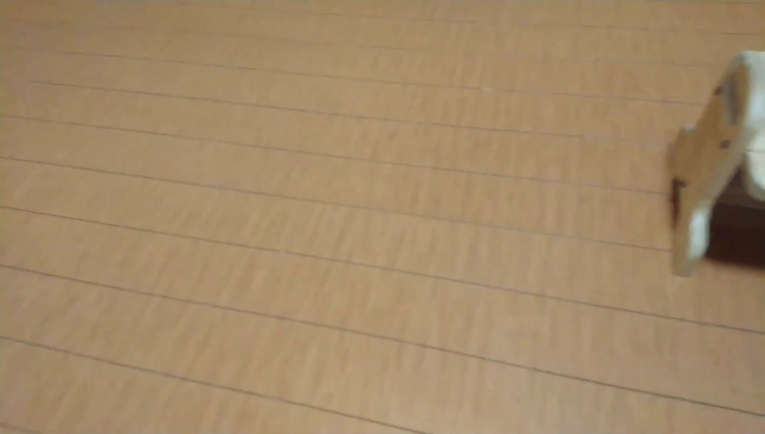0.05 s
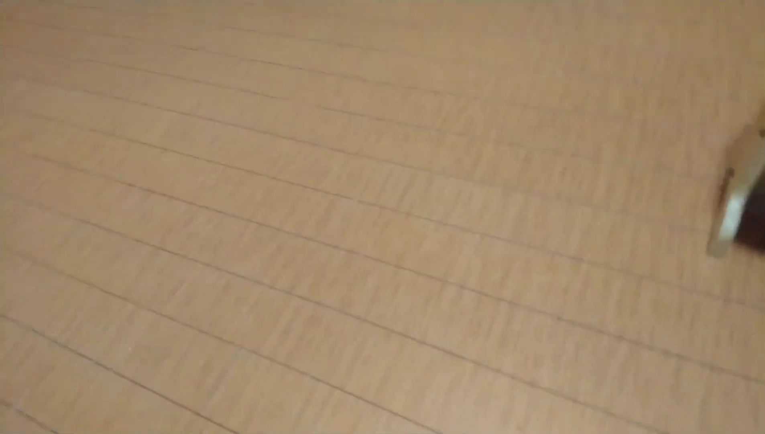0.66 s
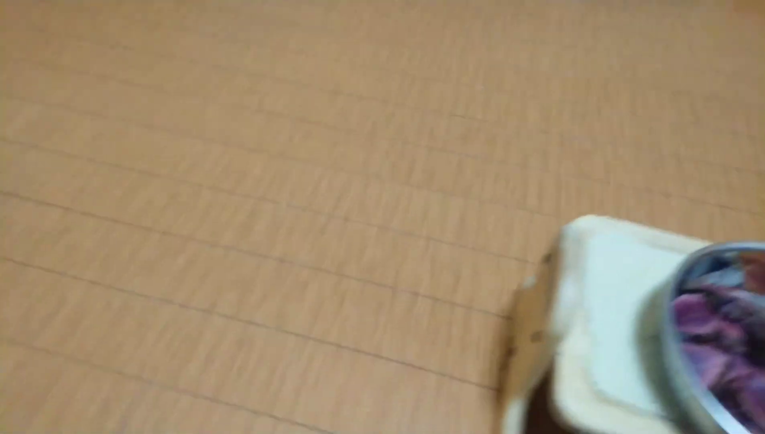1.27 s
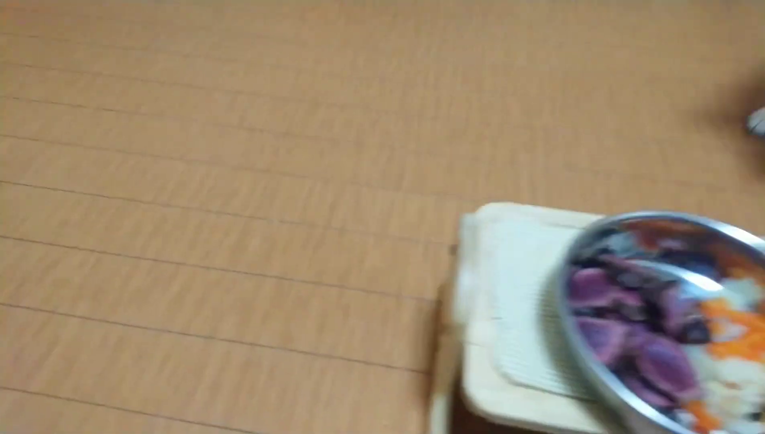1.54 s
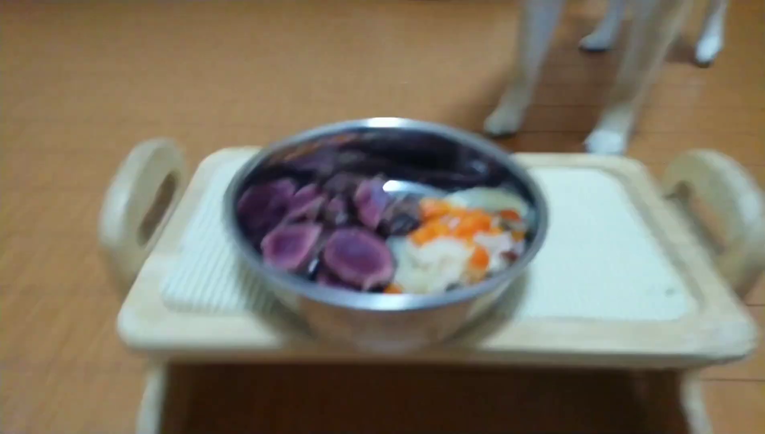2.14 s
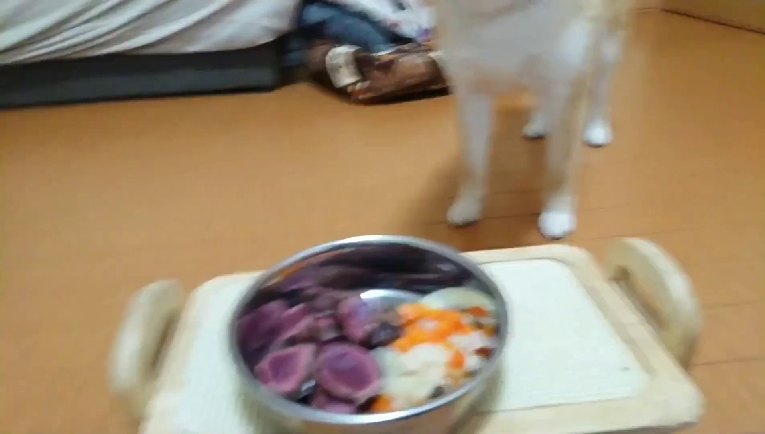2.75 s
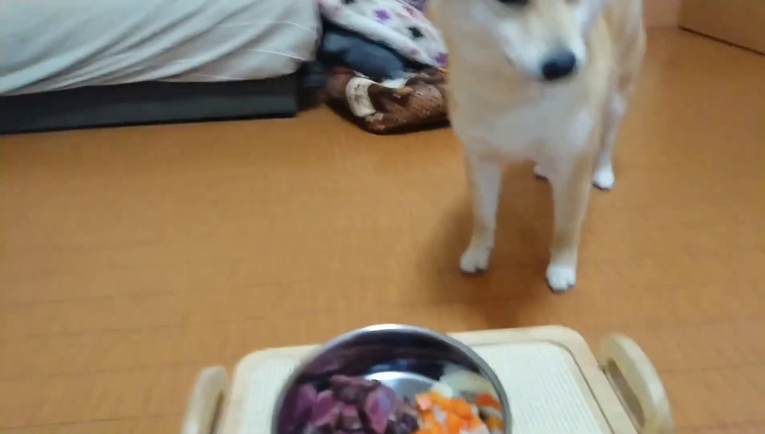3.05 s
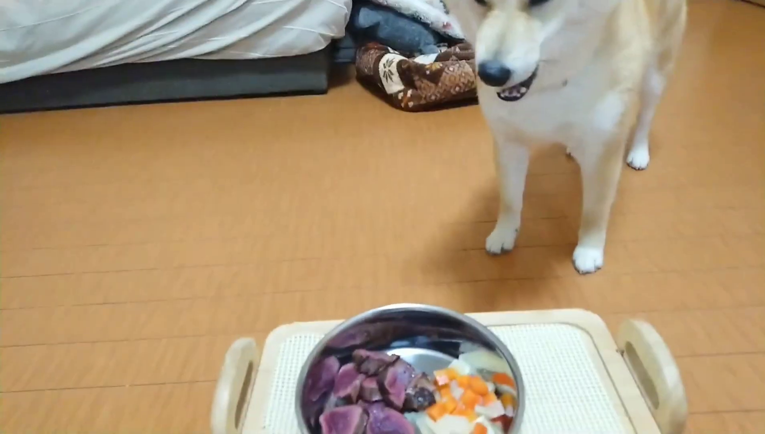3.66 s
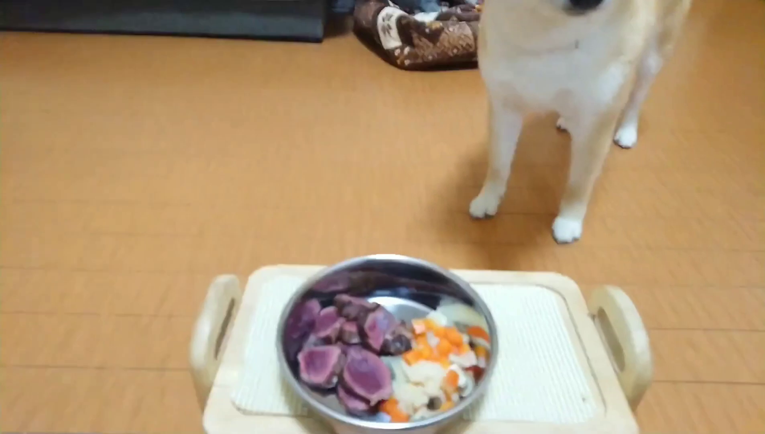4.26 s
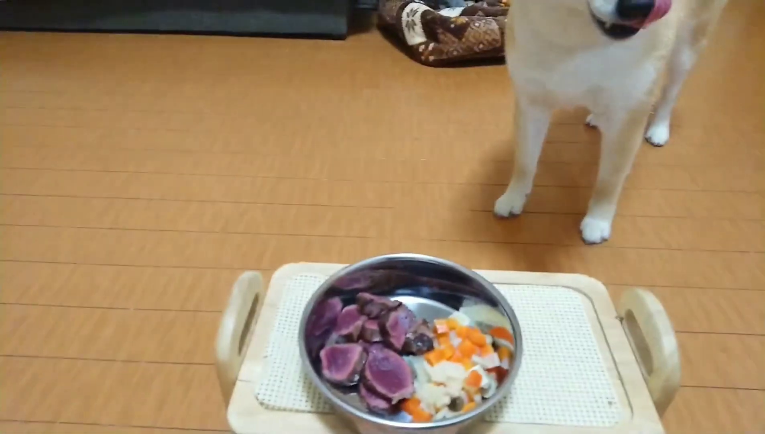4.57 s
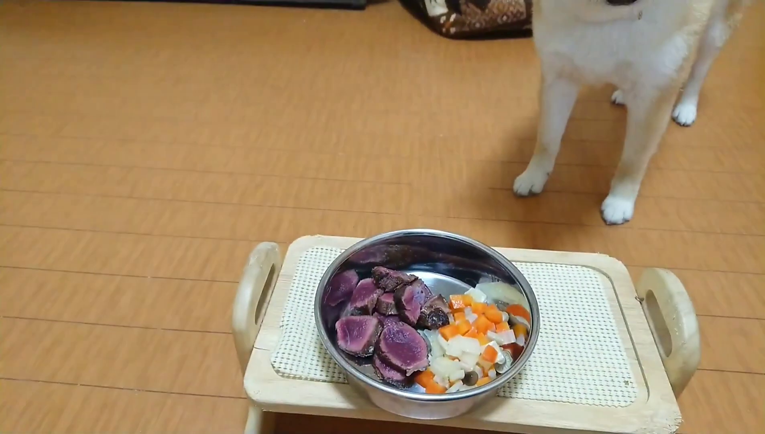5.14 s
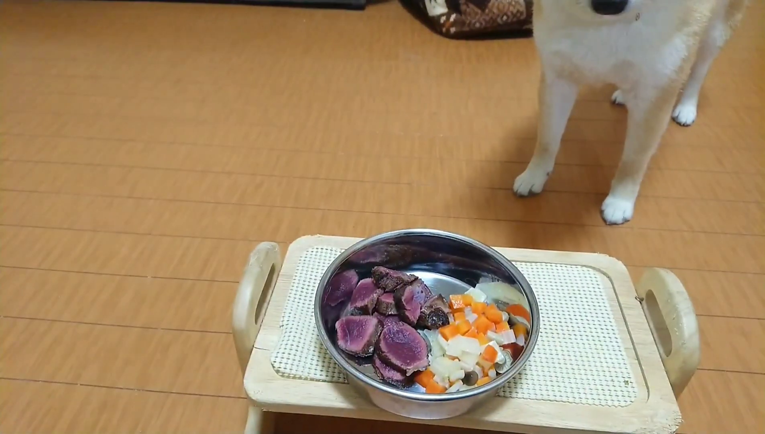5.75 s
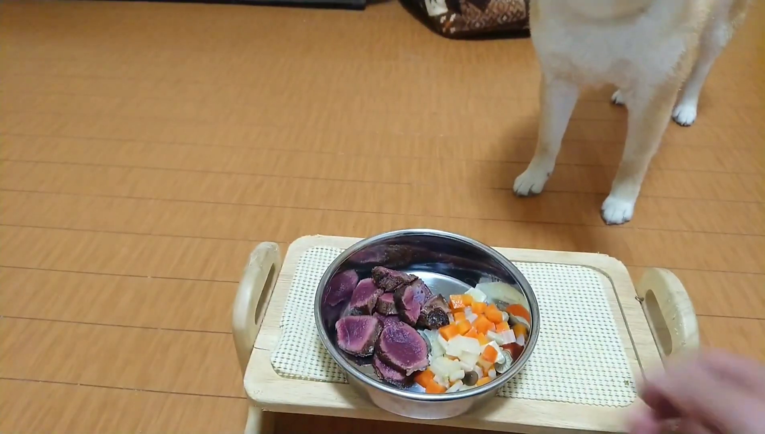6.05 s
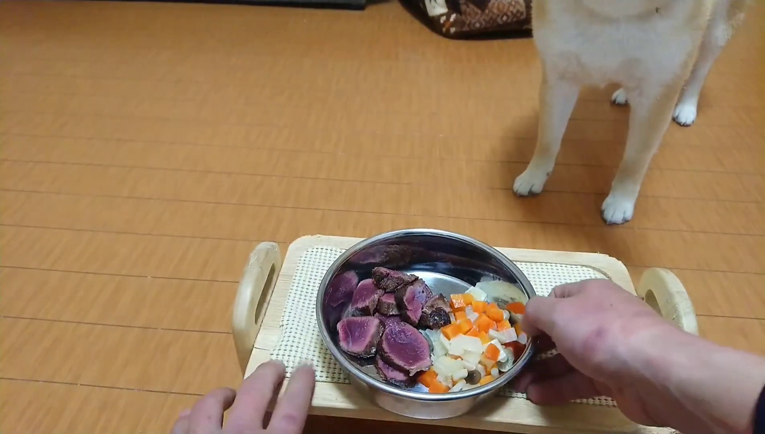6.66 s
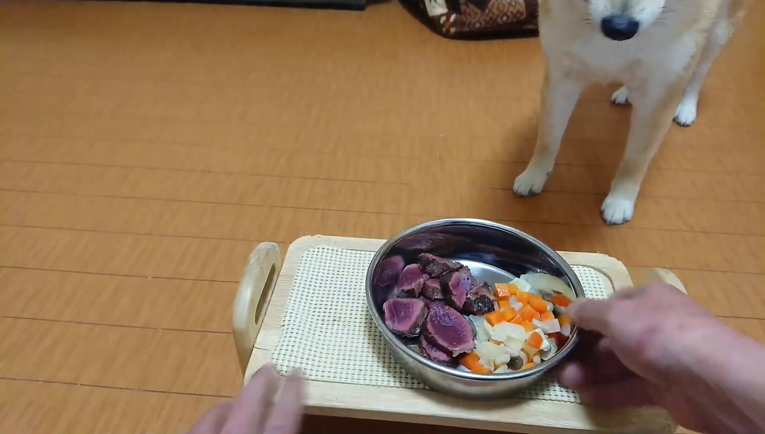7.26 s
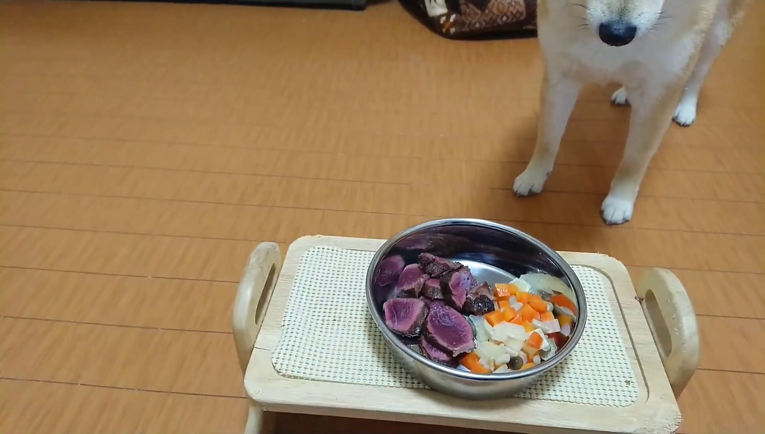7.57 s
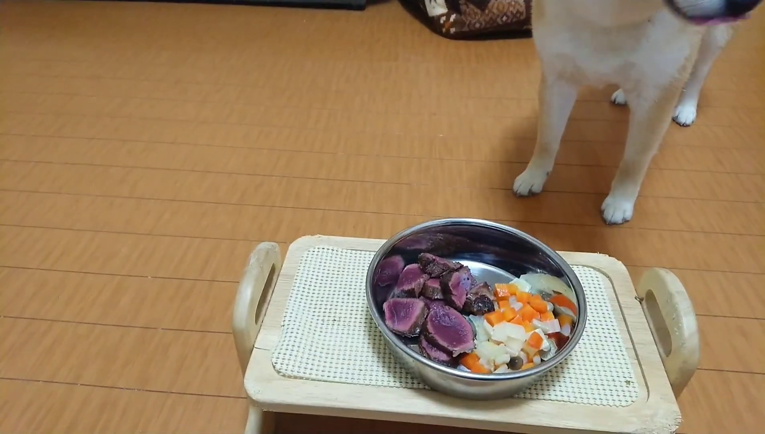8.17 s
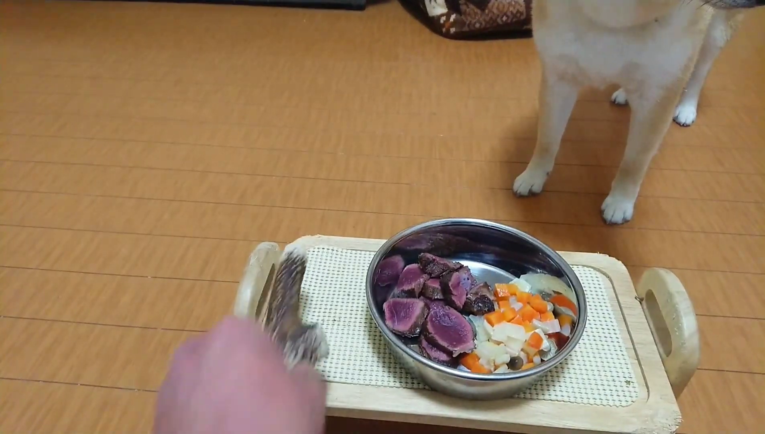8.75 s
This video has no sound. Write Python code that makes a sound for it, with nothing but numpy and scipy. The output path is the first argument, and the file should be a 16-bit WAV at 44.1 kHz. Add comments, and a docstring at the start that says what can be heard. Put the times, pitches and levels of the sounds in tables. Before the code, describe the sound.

At about 0.3 seconds a small wooden feeding stand lands on a wooden floor in a loud, quick clatter, and the steel bowl on it rings faintly. From 1 second the stand is pushed, its feet scraping and catching, then giving a harsh groan and hoot between 1.6 and 1.9 seconds. From about 2.3 to 5 seconds fingers shift on the microphone with close hollow bumps, pops, ticks and rubbing, sharpest around 3 seconds, with a low creak near 4.8. Clothes swish from 5.5 seconds and a sole scuffs near 6. At 7.2 seconds the full bowl is set on the stand with two knocks and a short, damped ring, and the stand rocks with a few low thuds. Soft shuffling steps follow from 8 seconds to nearly 9. Everything is heard at arm's length in a small living room with a faint low rush.

```python
"""A wooden feeding stand with a steel bowl on it clatters down on a wooden floor; the bowl's rim rings.
At 1 s the stand is pushed: its feet scrape, then stick and slip so fast that they groan and hoot.
From 2 to 5 s fingers shift on the phone that hears it all: hollow bumps, pops, ticks and rubbing.
Clothes rustle and a sole scuffs. At 7 s the full bowl is set back, the stand rocks, and soft steps follow.
The place is a small living room, heard at arm's length."""
import sys
import numpy as np
from scipy import signal
from scipy.fft import rfft, irfft, next_fast_len
from scipy.io import wavfile
from scipy.ndimage import uniform_filter1d

SR = 44100
rng = np.random.default_rng(int(sys.argv[2]) if len(sys.argv) > 2 else 0)


def wrap_up_sound(samples):
    """Save the sound to the file named by the first command line argument, as 16-bit audio."""
    columns = np.atleast_2d(samples).T
    # keep every value between -1 and 1, then stretch to whole-number steps
    tamed = np.clip(columns, -1, 1)
    steps = np.round(tamed * 32767).astype(np.int16)
    wavfile.write(sys.argv[1], SR, steps)


N = 397244
T = np.arange(N) / SR

# Each row: start in seconds, level in dB, brightness in Hz, push on the floor in dB.
STAND_KNOCKS = [(0.274, -44, 200, -20.5), (0.2861, -14, 12100, -28), (0.2935, -19.5, 6000, -35),
                (.302, -19.5, 2600, -14.5), (0.312, -23.5, 2200, -24.5), (0.3495, -17.5, 9000, -27),
                (.377, -27.5, 1800, -21.5)]  # the legs land
FOOT_CATCHES = [(1.008, -39.5, 400, -41), (1.178, -36, 900, -38.5), (1.262, -36, 1700, -41.5)]  # a sliding foot catches on the boards
BOWL_KNOCKS = [(7.206, -19.5, 12000, -23), (7.2942, -24.5, 8000, -27)]  # the bowl lands on the stand's mat
# Modes are the notes a thing rings with. Each row: pitch in Hz, level in dB, seconds to fade by 60 dB.
STAND_MODES = [(479, -6.5, 0.18), (903, -0.5, .19), (1117, -3.5, 0.19), (1180, -0.5, 0.18), (1485, -1, 0.1),
               (1670, -3, 0.17), (2192, -1, 0.11), (2460, 2.5, 0.06), (3406, 2, 0.065), (4950, 0, 0.051)]  # wooden panels
BOWL_MODES = [(1045, 4, 0.26), (1230, 5, 0.28), (1977, -1, 0.09), (2720, -5, 0.066), (3340, -8.5, 0.13)]  # steel wall, damped by food and fingers
# The tone of the stand's clack. Each row: frequency in Hz, level in dB.
STAND_COLOUR = [(200, -6.5), (330, -12), (476, -7.5), (570, -11.5), (1020, -5.5), (1400, -12), (2400, -13),
                (4900, -15), (6200, -19), (10500, -29), (15000, -56.5)]


def undb(db):
    """Turn decibels into a gain."""
    return 10 ** (np.asarray(db) / 20)


def unit(x):
    """Scale to an average (rms) level of 1."""
    return x / np.sqrt(np.mean(x ** 2))


def pan(db):
    """Two gains that make the left side db louder than the right."""
    return undb(np.array([[db], [-db]]) / 2)


def delay_left(x, seconds):
    """The sound reaches the left microphone later than the right."""
    return np.array([np.roll(x[0], round(seconds * SR)), x[1]])


def add(out, s, x):
    """Mix x into out at s seconds."""
    i = int(s * SR)
    out[..., i:i + x.shape[-1]] += x[..., :N - i]


def cut(x, hz, kind="low", order=2):
    """Keep what lies below hz ("low") or above it ("high")."""
    return signal.sosfilt(signal.butter(order, min(hz, SR / 2 - 1000), kind, fs=SR, output="sos"), x)


def convolve(x, response):
    """Play x through something that answers a click with this response."""
    return signal.fftconvolve(np.atleast_2d(x), np.atleast_2d(response), axes=1)[:, :x.shape[-1]]


def colour(x, points, size=4096):
    """Shape the tone of x along a curve of (Hz, dB) points."""
    hz, db = np.transpose(points)
    freqs = np.maximum(np.fft.rfftfreq(size, 1 / SR), 1)
    gain = undb(np.interp(np.log(freqs), np.log(hz), db)) * np.minimum(freqs / hz[0], 1) ** 2
    # fold the filter in time so that it never sounds before its input
    cepstrum = irfft(np.log(gain))
    cepstrum[1:size // 2] *= 2
    cepstrum[size // 2 + 1:] = 0
    response = irfft(np.exp(rfft(cepstrum)))
    return convolve(x, response / np.linalg.norm(response))


def noise(count=N, alike_hz=600):
    """White noise at two microphones: alike in the bass, unrelated in the treble."""
    size = next_fast_len(count, real=True)
    mid, side = rfft(rng.standard_normal((2, size)))
    alike = .85 / (1 + (np.fft.rfftfreq(size, 1 / SR) / alike_hz) ** 2)
    spectrum = mid * np.sqrt(1 + alike) + side * np.sqrt(1 - alike) * np.array([[1], [-1]])
    return unit(irfft(spectrum, size)[:, :count])


def band(hz, width_hz):
    """A band of noise around one pitch."""
    return unit(cut(noise(), width_hz / 2) * np.cos(2 * np.pi * hz * T))


def walk(rate):
    """A random wobble of size about 1 that turns rate times a second."""
    step = max(int(SR / rate), 1)
    return unit(uniform_filter1d(np.repeat(rng.standard_normal(N // step + 1), step), step)[:N])


def fade(t60, count=SR):
    """A fade of 60 dB in t60 seconds."""
    return np.exp(-np.log(1000) * T[:count] / t60)


def swell(s, rise, fall, hold=0):
    """Rise to full strength at time s, hold, then fall; all in seconds."""
    before, after = np.maximum((s - T) / rise, 0), np.maximum((T - s - hold) / fall, 0)
    return np.exp(-np.minimum(before ** 2 + after * np.sqrt(after), 30))


def ring(modes):
    """A struck object: one fading sine for each mode."""
    return sum(undb(db) * fade(t60) * np.sin(2 * np.pi * hz * T[:SR]) for hz, db, t60 in modes)


def blow(x, db):
    """Give a short sound the energy of 10 ms at this level."""
    return x * undb(db) * np.sqrt(SR / 100 / np.mean(np.sum(x ** 2, axis=-1)))


def plop(hz, t60, count=4096):
    """One note that dies quickly."""
    return blow(np.sin(2 * np.pi * hz * T[:count]) * fade(t60, count), 0)


def chatter(t60, count=4096):
    """The tiny impacts of one contact: a noise burst, even from bass to treble."""
    spectrum = rfft(noise(count) * fade(t60, count))
    return irfft(spectrum / np.abs(spectrum)) * fade(4 * t60, count)


def knocks(rows, body, modes, chatter_t60, ring_db):
    """Each contact gives a short clack and a few notes that ring longer."""
    out, ringing = np.zeros((2, N)), blow(ring(modes), ring_db)
    for s, db, hz, _ in rows:
        contact = cut(chatter(chatter_t60), hz, order=1)
        add(out, s, blow(colour(contact, body), db))
        add(out, s, undb(db) * cut(ringing, hz, order=1))
    return out


def room(x, wet_db, bass_t60=0.33, treble_t60=0.19):
    """Add a small room's echo at wet_db; its treble dies first."""
    diffuse = noise(SR)
    bass = cut(diffuse, 2500, order=1)
    tail = (bass * fade(bass_t60) + (diffuse - bass) * fade(treble_t60)) * np.minimum(T[:SR] / 0.0092, 1)
    return x + undb(wet_db) * convolve(x, tail / np.linalg.norm(tail[0]))


def air(db=-55.5):
    """The room's faint, low rush wavers a little."""
    # Each row: frequency in Hz, level in dB.
    tone = [(30, -22), (65, -2), (163, -1), (364, -11), (524, -18), (1000, -24.5), (1920, -27.5),
            (5300, -23), (6360, -34.5), (10400, -31.5), (11600, -49.5)]
    return unit(colour(noise(), tone)) * undb(db + walk(4.4) + walk(17))


def rustle(stir_db=-66, full_db=-44, thin_hz=2200, rise_share=0.68):
    """Sleeves and trousers swish and stir faintly in between; light moves give only a thin hiss."""
    # Each row: peak time in seconds, level in dB, fall in seconds.
    swishes = [(0.239, -54.5, 0.047), (0.64, -56.5, 0.16), (1.205, -40.5, 0.43), (2.273, -48, 0.27),
               (2.803, -53, 0.73), (3.2, -46.5, 0.3), (3.614, -50, 0.15), (4.795, -55.5, 0.66),
               (5.076, -53, 0.1), (5.557, -38, 0.099), (5.693, -50.5, 0.091), (5.972, -34.5, 0.06),
               (6.302, -56, 0.22), (6.762, -53, 0.14), (7.016, -57.5, 0.098), (8.051, -48, 0.16),
               (8.44, -58.5, 0.13)]
    # The cloth's hiss. Each row: frequency in Hz, level in dB.
    tone = [(470, -28.5), (800, -3), (1570, -7.5), (2980, -4.5), (5510, -3), (6570, -8.5), (11300, -13),
            (14500, -21)]
    stir = undb(stir_db) * swell(1.43, rise=0.18, fall=0.13, hold=5.55)
    power = sum((undb(db) * swell(s, rise_share * fall, fall)) ** 2 for s, db, fall in swishes)
    motion = np.sqrt(stir ** 2 + power)
    full = unit(colour(noise() * undb(1.4 * walk(500) + walk(30)), tone))
    thin = cut(full, thin_hz, "high", order=1)
    weight = np.minimum(motion / undb(full_db), 1)
    return (weight * full + (1 - weight) * thin) * motion * pan(1)


def shuffles():
    """A soft sole gives a bright scuff, then a dull sweep whose hollow tone rises as it fades."""
    # Each row: start in seconds, scuff and sweep levels in dB, the sweep's rise and fall in seconds,
    # its treble and its hollow tone in dB relative to the sweep.
    steps = [(5.931, -42, -35.5, 0.022, 0.086, -15, 2.5), (7.995, -40.5, -36.5, .13, 0.11, -12, -13),
             (8.309, -45, -38.5, 0.033, 0.085, -13, -17)]
    # The dull sweep. Each row: frequency in Hz, level in dB.
    tone = [(150, -9.5), (272, -8.5), (320, -1), (662, -13), (937, -11), (1090, -12), (2000, -42),
            (2600, -51), (4400, -120)]
    dull = unit(colour(noise() * undb(2.3 * walk(150)), tone))
    bright = unit(cut(cut(noise() * undb(1.5 * walk(200)), 750, "high"), 2700, order=3))
    body, tail = band(660, width_hz=480), undb(-9) * band(1400, width_hz=1150)
    out = np.zeros((2, N))
    for s, scuff_db, sweep_db, rise, fall, treble_db, hollow_db in steps:
        out += (bright + undb(-5) * dull) * undb(scuff_db) * swell(s, 0.0022, 0.019)
        out += (dull + undb(treble_db) * bright) * undb(sweep_db) * swell(s + rise, 0.74 * rise, fall)
        hollow = body * swell(s + rise, rise, fall / 2) + tail * swell(s + rise + fall / 2, fall / 2, fall)
        out += hollow * undb(sweep_db + hollow_db)
    return out * pan(3.9)


def hand(db=-50.5, ease_db_per_s=1.1, start_s=1.05):
    """The hand rumbles on the phone's case, easing as the grip settles."""
    rumble = unit(cut(cut(noise(), 47, order=3), 63, "high", order=4)) * undb(1.8 * walk(16))
    level = undb(db - ease_db_per_s * (T - start_s)) * swell(start_s, 0.3, 0.23, hold=4)
    return rumble * level * pan(10)


def crackle(count=20, start_s=4.05, length_s=1.25, lowest_hz=500, octaves=2.58, db=-63, spread_db=7):
    """Shifting skin gives tiny dry clicks, random in time, pitch and strength."""
    out = np.zeros((2, N))
    for when, pitch, size in rng.random((count, 3)):
        hz = lowest_hz * 2 ** (octaves * pitch)
        click = cut(cut(chatter(t60=.012), hz / 2, "high"), 2 * hz)
        add(out, start_s + when * length_s, blow(click, db + spread_db * size))
    return out


def finger(stutter_hz=105, stutter_db=-37):
    """Skin hisses along the case and scuffs it once; later it stutters in a low creak."""
    # Each row: time of full speed and hold in seconds, level in dB, centre and width of the hiss in Hz.
    strokes = [(1.484, 0.11, -46.5, 2510, 350), (2.778, 0.14, -49.5, 2780, 1100),
               (3.044, 0.22, -47, 3440, 940), (3.283, 0.074, -50, 2410, 520)]
    hiss = np.zeros((2, N))
    for s, hold, db, hz, width_hz in strokes:
        drag = unit(cut(cut(noise(), 830), 450, "high"))
        skin = band(hz, width_hz) + undb(-7) * unit(cut(noise(), 3500)) + undb(-9.5) * drag
        hiss += skin * undb(db) * swell(s, 0.065, 0.018, hold)
    low_scuff = undb(-33.5) * unit(cut(cut(noise(), 430), 100, "high"))
    scuff = (low_scuff + undb(-36.5) * unit(cut(noise(), 3800))) * swell(2.787, 0.016, 0.079)
    cycle = np.cumsum(stutter_hz * (1 + .35 * walk(110))) / SR % 1
    buzz = unit(cut(cycle - .5, 205))
    rumble = undb(3.5) * unit(cut(noise(), 110))
    rasp = undb(-4.5) * unit(cut(noise() * (1 - 0.4 * cycle), 1040, order=1))
    creak = (buzz + rumble + rasp) * undb(stutter_db) * swell(4.805, 0.024, 0.079)
    return hiss + scuff + creak * pan(3.7)


def grip(case_hz=190, case_t60=0.056):
    """Fingers bump, pop, press and tick. The sound travels through the case, so it has no echo."""
    # Each row: start in seconds, level in dB, brightness in Hz, fade in seconds, hollow note in Hz,
    # then in dB: that note and the case's ring relative to the rattle, and left minus right.
    bumps = [(2.332, -41.5, 1800, 0.065, 285, 1.5, 0, -12),
             (2.6493, -28.5, 1280, 0.045, 537, -3, -1.5, 5.5), (2.662, -36, 400, 0.15, 260, 2.5, 10.5, 9),
             (2.774, -23.5, 2600, 0.027, 1400, 2.5, 0.5, 5.5), (2.781, -34.5, 900, .06, 374, 5.5, -2, 7.5),
             (2.9082, -17, 2200, .014, 690, 0.5, -14, 6.5), (2.914, -28, 1503, .0072, 450, 1.5, -16, -9.5),
             (3.2551, -18, 1900, 0.013, 706, 0, -23, 5), (3.2575, -28, 2400, 0.016, 220, 6, -5, 8.5),
             (4.168, -32.5, 418, 0.017, 337, 2, -9.5, -9.5), (5.1505, -45.5, 890, 0.022, 302, 7, 0, -12.5)]
    # Skin peels off. Each row: start in seconds, level in dB, pitch in Hz, left minus right in dB.
    pops = [(2.384, -46.5, 414, 13), (2.867, -44.5, 620, 19), (3.389, -49.5, 520, -12),
            (4.102, -46.5, 1080, -5), (4.263, -53, 400, 11), (4.293, -39.5, 394, 6), (4.397, -50, 865, -5),
            (4.52, -42.5, 466, 7), (4.879, -40.5, 445, 4), (4.997, -50, 700, -16)]
    # The palm thuds. Each row: start in seconds, level in dB.
    presses = [(2.911, -33), (4.171, -31), (4.792, -33), (4.826, -30), (4.88, -29)]
    # Each row: start in seconds, level in dB, lowest and highest pitch in Hz, left minus right in dB.
    ticks = [(2.478, -47.5, 990, 15000, -12.5), (2.774, -49, 500, 9000, -3),
             (2.909, -32.5, 2475, 8940, -12), (3.2565, -33.5, 2500, 12000, 10), (3.7, -50, 600, 4000, 11),
             (4.17, -47.5, 10400, 15500, -13), (4.229, -53, 2500, 15000, -13), (4.607, -46, 1800, 8000, -2),
             (4.659, -43.5, 1700, 7000, 0), (4.752, -40, 1300, 6000, 1), (4.789, -41, 900, 6000, 2),
             (4.815, -41.5, 1200, 7000, -5), (4.901, -41.5, 700, 2300, 0), (4.985, -47, 400, 1500, -4)]
    out = np.zeros((2, N))
    for s, db, hz, t60, note_hz, note_db, ring_db, pan_db in bumps:
        rattle = blow(cut(cut(chatter(t60), hz), 120, "high"), 0)
        # the pocket of air under each finger has its own note
        pocket = plop(note_hz, t60) + undb(-11) * plop(2.1 * note_hz, t60)
        hollow = undb(note_db) * cut(pocket, note_hz / 2, "high")
        case = undb(ring_db) * plop(case_hz, case_t60)
        add(out, s, undb(db) * (rattle + hollow + case) * pan(pan_db))
    for s, db, hz, pan_db in pops:
        note = cut(cut(plop(hz, t60=0.014), hz / 2, "high"), 2 * hz)
        click = blow(cut(cut(chatter(t60=0.045), 2 * hz), hz / 2, "high"), db=-11)
        add(out, s, blow(note + click, db) * pan(pan_db))
    for s, db in presses:
        add(out, s, blow(cut(plop(hz=60, t60=.06), 180), db))
    # The tone of a tick. Each row: frequency in Hz, level in dB.
    tick_tone = [(300, 3.5), (1800, 6), (5000, 0.5), (8000, -7.5), (15000, -17)]
    for s, db, low_hz, high_hz, pan_db in ticks:
        tick = colour(chatter(t60=0.0054), tick_tone)
        tick = cut(cut(tick, low_hz, "high", order=4), high_hz)
        add(out, s, blow(tick, db) * pan(pan_db))
    return out


def boards(stand_push_s=0.007, bowl_push_s=0.0012, thump_push_s=0.0074):
    """Landings and soft thumps push on the floor; a long push stirs only its lowest notes."""
    # Each row: pitch in Hz, level in dB, fade in seconds.
    floor_modes = [(65.5, -7, 0.22), (83.6, -7, 0.18), (93.3, -7.5, 0.16), (166, 3.5, 0.33),
                   (194, -7, 0.141), (362, -8, 0.16)]
    # Soft thumps on the floor: the stand's feet breaking loose, a hand on the stand, and steps.
    # Each row: start in seconds, level in dB.
    floor_thumps = [(1.066, -32), (2.19, -30.5), (3.435, -37.5), (6.965, -39), (8.12, -33), (8.8, -42.5)]
    pushes = [(s, db, stand_push_s) for s, _, _, db in STAND_KNOCKS + FOOT_CATCHES]
    pushes += [(s, db, bowl_push_s) for s, _, _, db in BOWL_KNOCKS]
    pushes += [(s, db, thump_push_s) for s, db in floor_thumps]
    force = np.zeros(N)
    for s, db, length in pushes:
        push = np.sin(np.pi * np.minimum(T[:SR] / length, 1))
        add(force, s, undb(db) * push / push.sum())
    return convolve(force, ring(floor_modes))


def rocking():
    """The stand rocks under the bowl and settles, each leg with its own thud."""
    # Each row: start in seconds, level in dB, pitch in Hz.
    thuds = [(7.22, -24, 79), (7.361, -21.5, 86.6), (7.386, -27, 134.4), (7.429, -28.5, 109),
             (7.474, -28.5, 82.5), (7.512, -33.5, 104.6)]
    out = np.zeros(N)
    for s, db, hz in thuds:
        add(out, s, blow(cut(plop(hz, t60=0.032, count=8192), 2 * hz), db))
    return out


def rim():
    """Jolts set the bowl's steel rim ringing on two notes."""
    # Each row: pitch in Hz, fade in seconds.
    notes = [(1260, 1.48), (2182, 1.97)]
    # Each row: start in seconds, levels of the lower and the upper note in dB.
    jolts = [(.29, -46.5, -66), (1.75, -54, -51)]
    out = np.zeros((2, N))
    for s, *levels_db in jolts:
        add(out, s, ring([(hz, db, t60) for (hz, t60), db in zip(notes, levels_db)]))
    return out


def bowl_landing():
    """The full bowl knocks twice on the mat and its wall rings briefly."""
    # The bowl's clack. Each row: frequency in Hz, level in dB.
    tone = [(150, -19), (350, 1.5), (520, -12), (640, -10.5), (880, -18), (1150, -4), (1650, -23),
            (2000, -15.5), (2400, -22.5), (5400, -28), (7000, -38.5), (15000, -55)]
    return knocks(BOWL_KNOCKS, tone, BOWL_MODES, chatter_t60=0.02, ring_db=-9)


def stand_landing():
    """The legs hit the floor one after another and the panels ring."""
    return knocks(STAND_KNOCKS, STAND_COLOUR, STAND_MODES, chatter_t60=0.032, ring_db=-5)


def slide(load, start_s=1.022, fall_s=0.032, db=-36.5, load_db=4, grain_db=3, scuff_db=0.95):
    """Wooden feet creep, then scrape and catch on the grain; the scrape grows under load."""
    # The scrape. Each row: frequency in Hz, level in dB.
    tone = [(70, -0.5), (130, -10), (200, -1.5), (300, -6), (380, 2), (540, -7), (800, -10), (1500, -17.5),
            (2500, -14.5), (3600, -23), (5200, -16), (6400, -39.5), (12000, -48)]
    creep = undb(-15) * swell(start_s, 0.33, fall_s)
    speed = creep + swell(start_s, 0.017, fall_s, hold=0.763)
    grit = noise() * undb(grain_db * walk(400) + scuff_db * walk(45))
    scrape = unit(colour(grit, tone)) * speed * undb(db + load_db * load)
    return scrape + knocks(FOOT_CATCHES, STAND_COLOUR, STAND_MODES, chatter_t60=0.04, ring_db=-9.5)


def judder(load, slip_hz=379.5, sag_hz=6.5, jitter=.021, free_rough=0.24, choke_db=9.5, wall_hz=1227):
    """The feet stick and slip, shaking stand and bowl: harsh under load, then a pure hoot."""
    # The harsh rasp. Each row: frequency in Hz, level in dB.
    tone = [(400, -9), (750, -3), (1150, -4.5), (1500, -10), (1880, -7.5), (2400, -8.5), (3100, -19),
            (4700, -11.5), (6500, -24), (12000, -42)]
    # Each row: multiple of the slip rate, level in dB, time of full strength in seconds.
    overtones = [(2, -20.5, 1.63), (3, -25.5, 1.645), (5, -39, 1.636), (6, -38, 1.664)]
    rough = free_rough + (1 - free_rough) * load
    turns = np.cumsum((slip_hz - sag_hz * load) * (1 + jitter * rough * walk(300))) / SR
    slips = np.diff(np.floor(turns), prepend=0) * undb(5 * rough * walk(200))  # one click a turn
    grind = colour(unit(slips) + undb(-2) * noise(), tone)
    harsh = undb(-20) * unit(room(grind, wet_db=-0.5))
    shaken_bowl = undb(-28) * unit(convolve(noise(), ring(BOWL_MODES)))
    rasp = rough * (harsh + shaken_bowl) * swell(1.637, rise=0.026, fall=0.05, hold=0.07)
    clean = np.zeros(N)
    for multiple, db, s in overtones:
        level = undb(db + 3 * rough * walk(110)) * swell(s, 0.02, 0.056, hold=0.063)
        clean += level * unit(np.sin(2 * np.pi * multiple * turns))
    # the bowl's wall briefly joins in
    squeal = unit(np.sin(2 * np.pi * wall_hz * T)) * undb(-17) * swell(1.668, 0.004, 0.0073)
    hoot = unit(np.sin(2 * np.pi * turns)) * undb(-21 - choke_db * load)
    hoot *= swell(1.608, rise=0.013, fall=0.024, hold=0.215)
    return delay_left(rasp + room(clean + squeal, wet_db=-13), .00009) + hoot * pan(3.1)


def scene(stand_lag_s=.00028, bowl_lag_s=.0001, case_lag_s=.00021):
    """Stand, bowl and floor sound in the room; the handling is right at the microphones."""
    stand = room(stand_landing(), wet_db=-6.5) * pan(2.9)
    bowl = room(bowl_landing(), wet_db=-6) * pan(3.5)
    load = swell(1.645, rise=0.04, fall=0.026, hold=.07)  # the feet dig in near the end of the push
    scrape = room(slide(load), wet_db=-5) * pan(2)
    groan = room(judder(load), wet_db=-18) * pan(0.79)
    floor = room(boards() + rocking(), wet_db=-10) * pan(7)
    background = air()
    furniture = delay_left(stand + scrape, stand_lag_s) + groan + delay_left(bowl, bowl_lag_s) + rim()
    handling = delay_left(grip(), case_lag_s) + crackle() + finger() + hand()
    person = delay_left(shuffles(), stand_lag_s) + rustle()
    return background + person + handling + floor + furniture


def record(dry, bottom_hz=46, top_hz=15600):
    """The phone drops the deepest bass, rounds the loudest peaks and cuts the top."""
    rounded = np.tanh(cut(dry, bottom_hz, "high", order=4))
    return signal.sosfilt(signal.ellip(8, .2, 70, top_hz, fs=SR, output="sos"), rounded)


dry = scene()
out = record(dry)
wrap_up_sound(out)
```